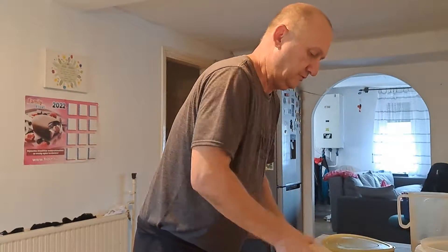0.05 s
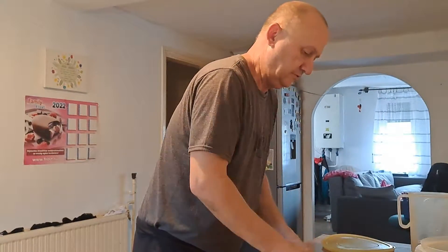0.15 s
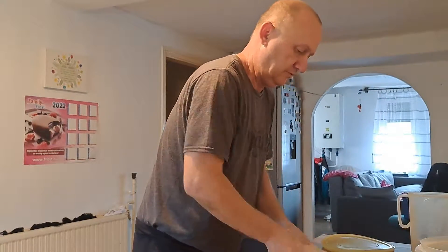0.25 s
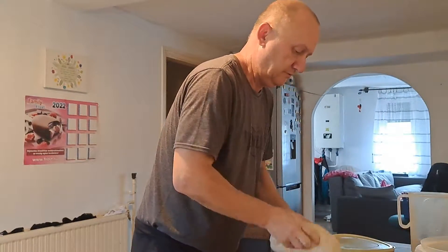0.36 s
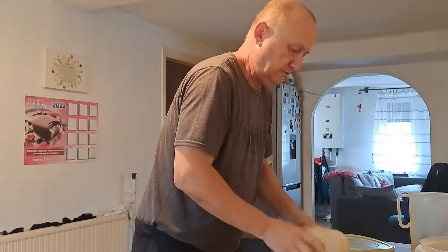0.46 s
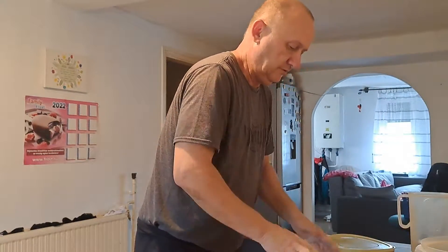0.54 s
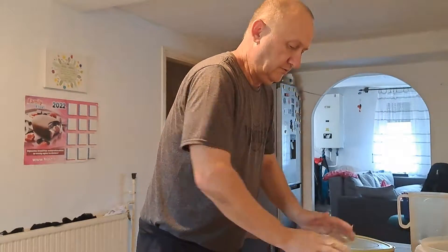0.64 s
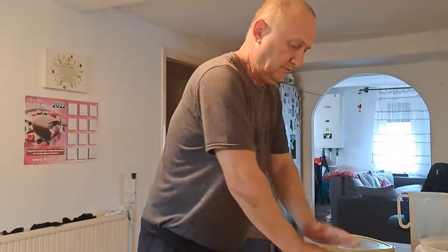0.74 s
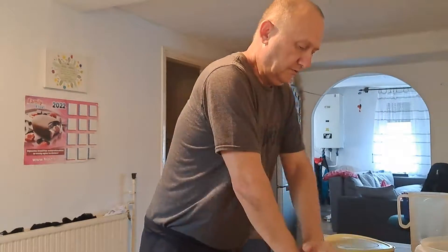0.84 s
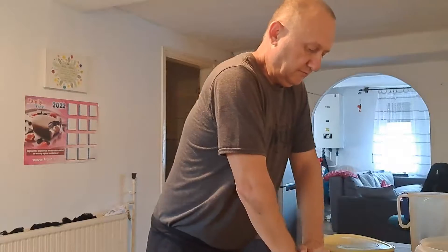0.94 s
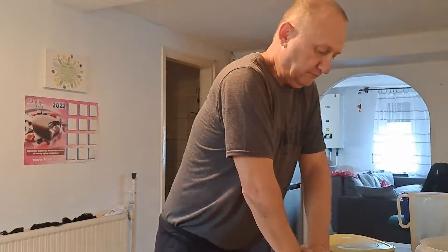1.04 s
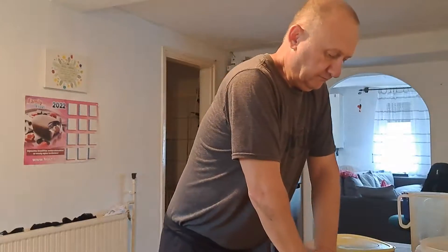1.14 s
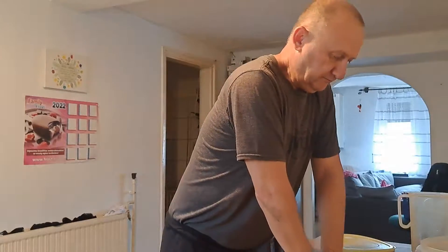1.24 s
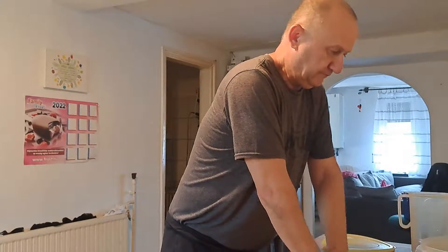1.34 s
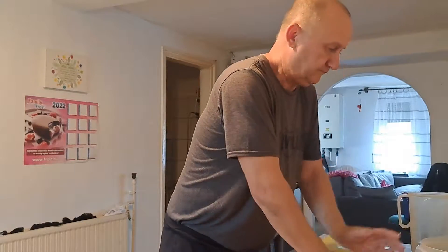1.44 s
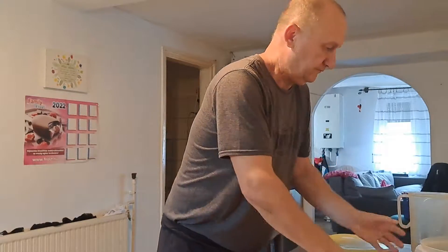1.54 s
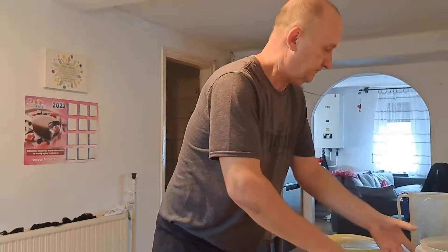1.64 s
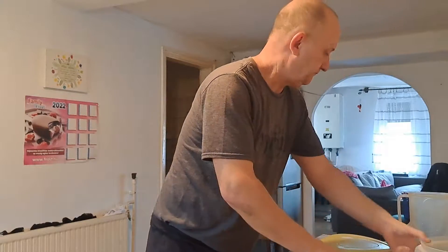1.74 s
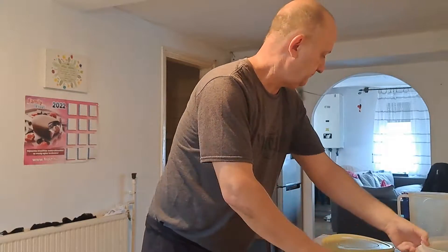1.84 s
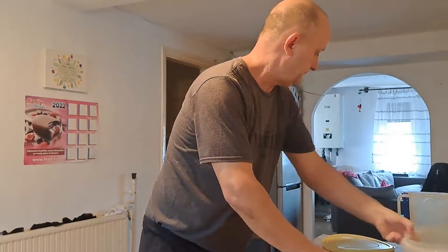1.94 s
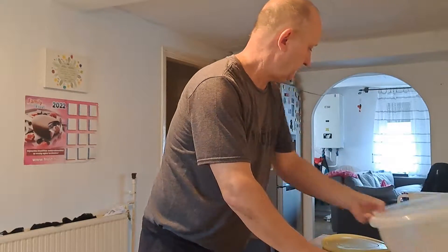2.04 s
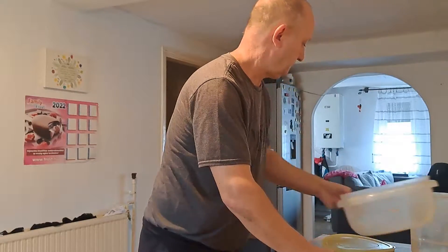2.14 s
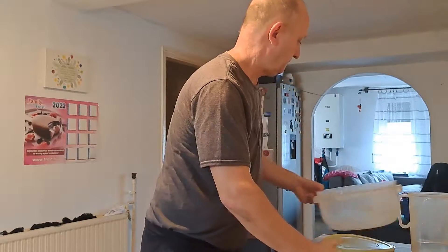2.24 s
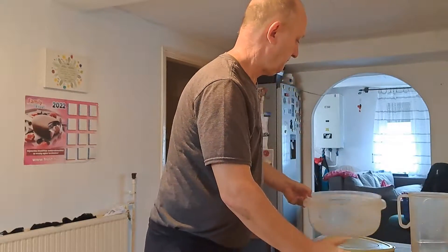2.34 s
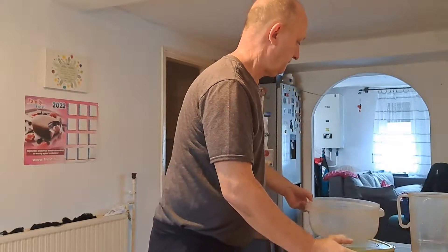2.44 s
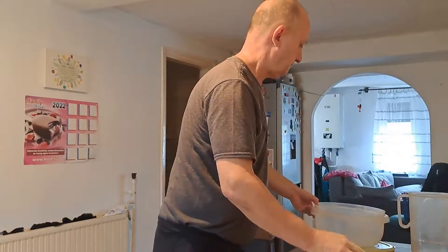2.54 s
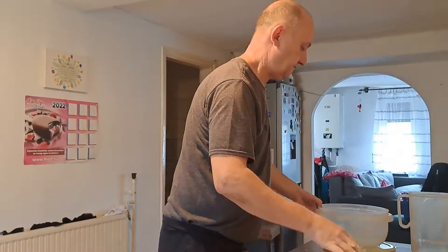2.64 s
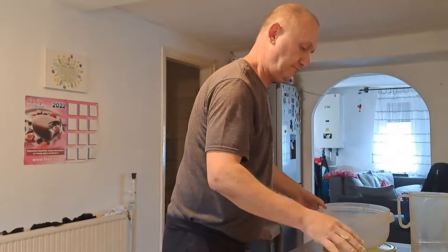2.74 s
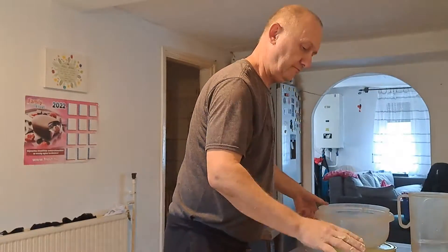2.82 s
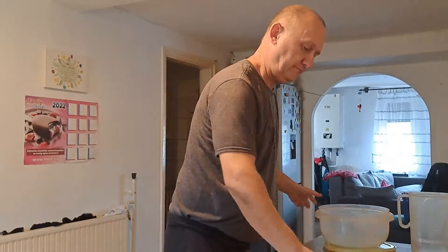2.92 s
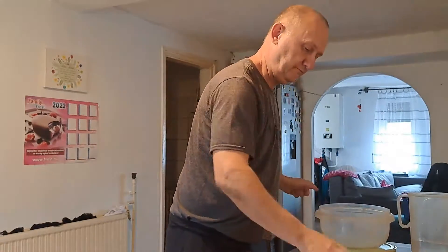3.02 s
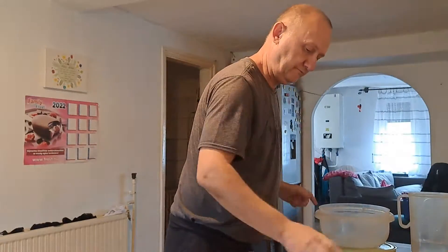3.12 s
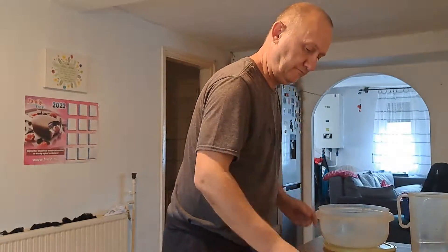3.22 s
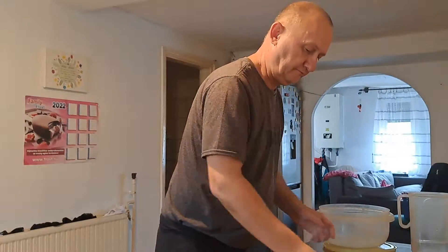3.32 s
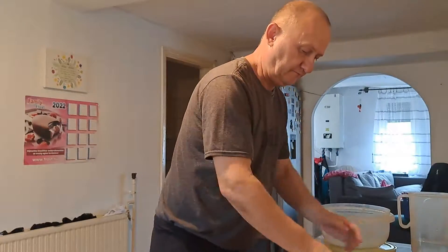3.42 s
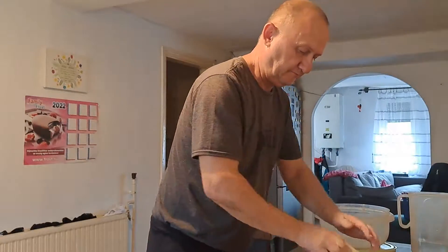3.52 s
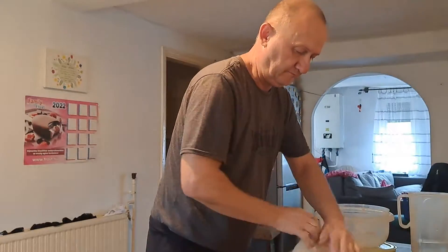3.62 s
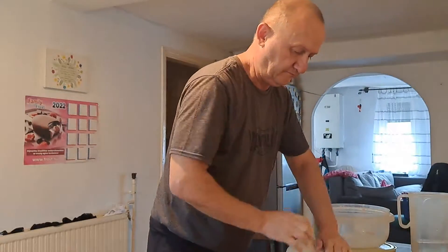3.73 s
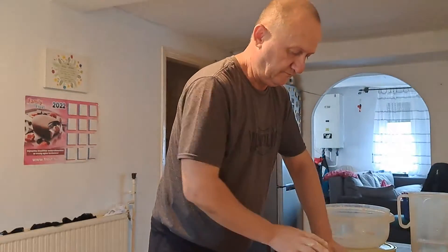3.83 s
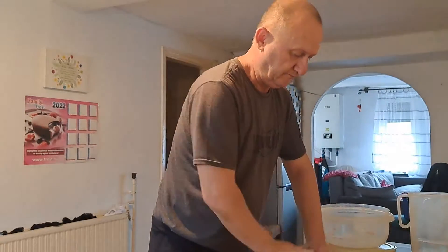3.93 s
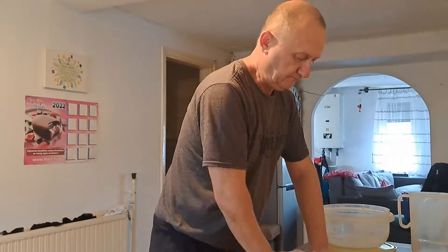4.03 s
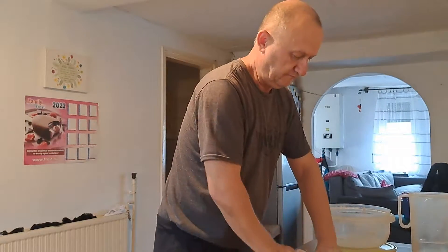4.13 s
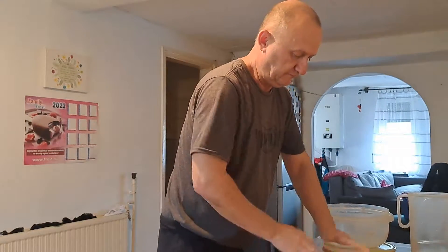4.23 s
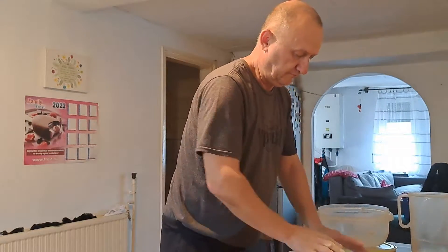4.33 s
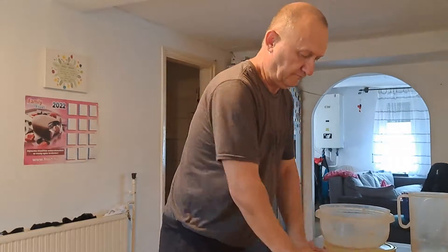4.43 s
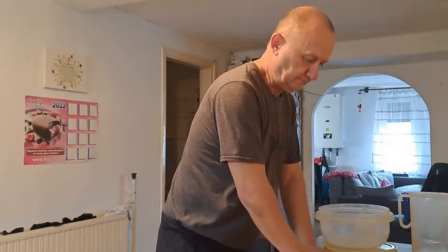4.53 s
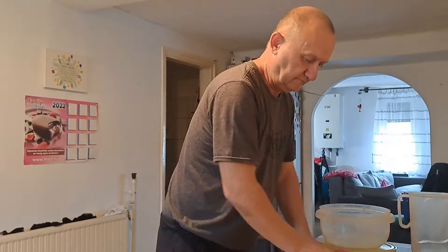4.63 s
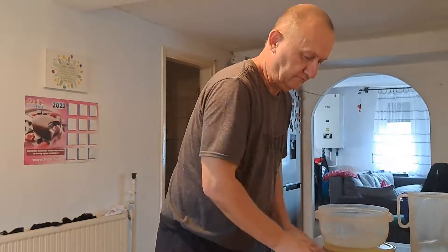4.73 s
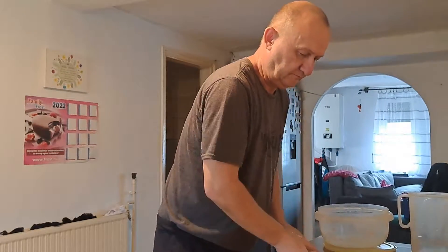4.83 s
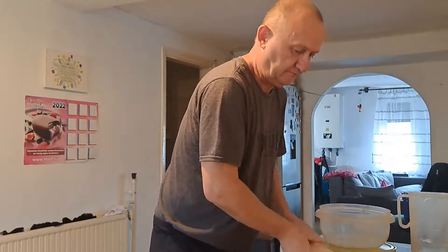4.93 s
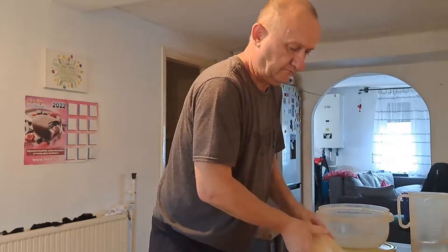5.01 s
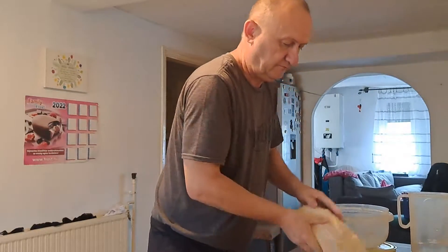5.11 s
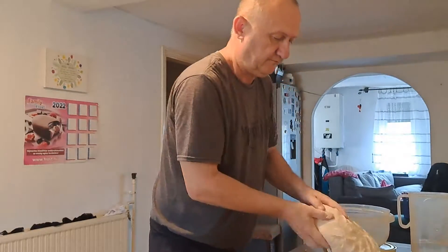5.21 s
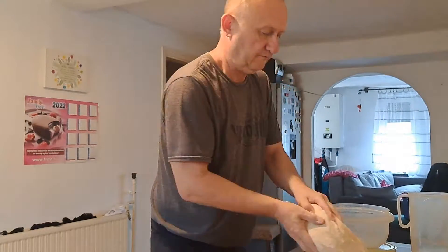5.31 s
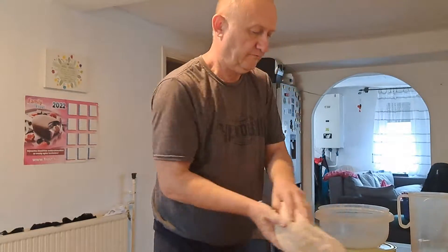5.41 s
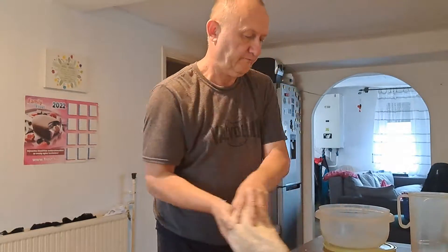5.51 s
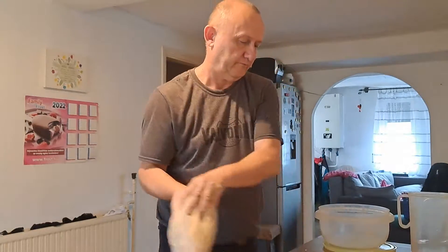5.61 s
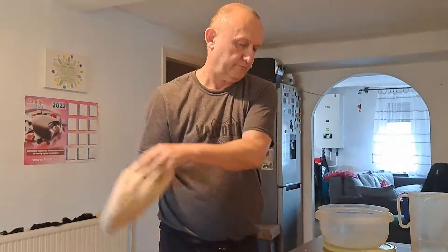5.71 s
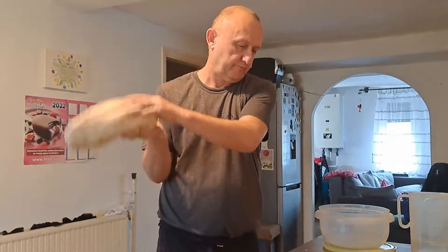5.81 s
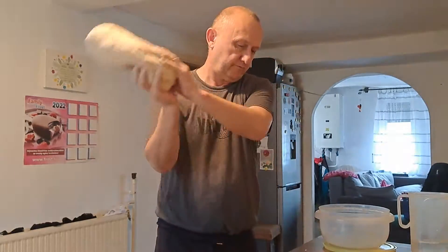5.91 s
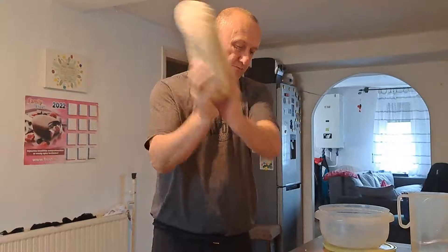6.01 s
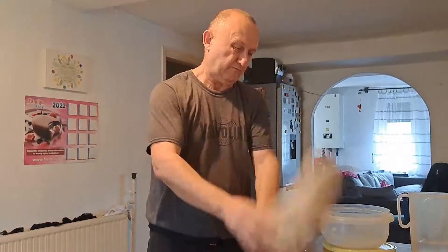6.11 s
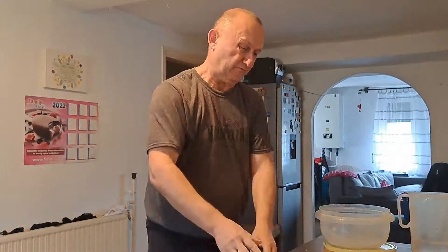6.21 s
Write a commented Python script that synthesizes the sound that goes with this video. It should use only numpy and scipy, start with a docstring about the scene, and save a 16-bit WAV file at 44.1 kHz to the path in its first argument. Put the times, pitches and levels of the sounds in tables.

```python
"""Bread dough drags over a floury kitchen table and takes soft pushes and smacks from the palms.
Each blow booms the table, knocks the board, pops out air and puffs flour. A plastic bowl is gripped
and set down with a clatter, and the table shudders as the baker leans on it. At last the dough is
swung overhead with a faint rush and slammed down, all about a metre away in a small, live room."""
import sys
import numpy as np
from scipy import signal
from scipy.fft import rfft, irfft
from scipy.io import wavfile

SR = 44100
rng = np.random.default_rng(int(sys.argv[2]) if len(sys.argv) > 2 else 0)


def persist_wave(psi):
    """Save psi, clipped to +-1, as 16-bit WAV."""
    counts = np.round(np.clip(psi, -1, 1) * 32767).astype(np.int16)
    wavfile.write(sys.argv[1], SR, np.atleast_2d(counts).T)


N = 276066
T = np.arange(N) / SR
AGE = T[:SR // 2]  # time since a blow
BLOW_HZ = np.arange(len(AGE) // 2 + 1) * SR / len(AGE)


def undb(db):
    """Decibels to gain."""
    return 10 ** (np.asarray(db) / 20)


def level(x, db, size=None):
    """Set the rms of the first size samples (all if none)."""
    return x * undb(db) / np.sqrt(np.mean(x[..., :size] ** 2))


def blow_level(x, db):
    """Set the rms of the first 35 ms of a blow."""
    return level(x, db, size=1544)


def add(out, s, x):
    """Mix x into out from time s."""
    i = int(np.clip(s * SR, 0, N - 1))
    out[:, i:i + x.shape[-1]] += x[..., :N - i]


def along(points, hz):
    """Read (f/Hz, value) points on a log-frequency axis."""
    f, value = np.transpose(points)
    return np.interp(np.log(hz + 1e-9), np.log(f), value)


def tint(x, points, size=1024):
    """EQ x with a curve of (f/Hz, gain/dB) points, made causal by way of the cepstrum."""
    gain = undb(along(points, np.arange(size // 2 + 1) * SR / size))
    cepstrum = irfft(np.log(gain))
    cepstrum[1:size // 2] *= 2
    cepstrum[size // 2 + 1:] = 0
    response = irfft(np.exp(rfft(cepstrum)))
    return signal.fftconvolve(np.atleast_2d(x), np.atleast_2d(response), axes=-1)[:, :x.shape[-1]]


def diffuse(size, port_gap_s=0.00051):
    """Spectrum of noise from all sides at two microphone ports: alike in the bass, wide in the treble."""
    count = size // 2 + 1
    mid, side = np.exp(2j * np.pi * rng.random((2, count)))
    alike = np.sinc(2 * port_gap_s * np.arange(count) * SR / size)
    mid, side = mid * np.sqrt(1 + alike), side * np.sqrt(1 - alike)
    return np.array([mid + side, mid - side]) * np.sqrt(size / 2)


def noise():
    """Diffuse white noise, as long as the scene."""
    return irfft(diffuse(N), N)


def rise(seconds):
    """Soft attack of a blow."""
    return 1 - np.exp(-AGE / seconds)


def fade(t60):
    """Exponential decay of a blow."""
    return np.exp(-np.log(1000) * AGE / t60)


def walk(rate):
    """Smooth random drift with a spread near 1."""
    knots = np.arange(0, T[-1] + 1, 1 / rate)
    return np.interp(T, knots, rng.standard_normal(len(knots)))


def gesture(start, length, attack_s, release_s):
    """Envelope of one movement: it builds, holds and dies away."""
    attack = np.clip((T - start) / attack_s, 0, 1)
    return attack * np.exp(-np.maximum(T - start - length, 0) / release_s)


# EQ of the quiet house: f/Hz, gain/dB
HOUSE_EQ = [(15, -32), (25, 2), (64, 2), (260, -11), (368, -5), (567, -18.5), (945, -8), (1110, -16.5),
            (4500, -30), (7500, -21), (9300, -28), (12200, -23), (15500, -24)]


def room_tone():
    """A faint steady bed of house rumble and hiss."""
    return level(tint(noise(), HOUSE_EQ, size=4096), -76)


# quick strokes through flour and air: peak t/s, half length/s, level/dB
STROKES = [(0.087, 0.028, -62.5), (0.563, 0.049, -67), (1.238, .06, -74), (1.917, 0.05, -70.5),
           (2.413, 0.028, -73), (2.79, .09, -74.5), (3.458, 0.054, -68), (3.66, 0.066, -68.5),
           (3.854, 0.079, -80.5), (4.683, 0.036, -64), (4.887, 0.046, -63.5), (5.146, 0.1, -66.5),
           (5.535, 0.026, -57), (5.637, 0.058, -62.5), (5.95, 0.072, -65.5), (6.222, 0.026, -54)]
# the dough is shoved or turned on the board: t/s, length/s, relative level/dB
SHOVES = [(0, 0.46, -66), (0.622, .26, -57), (1.274, 0.066, -52.5), (1.56, .32, -61.5),
          (1.992, 0.45, -73.5), (3.437, 0.22, -67.5), (4.144, 0.35, -62), (4.6, 0.25, -54),
          (4.894, .14, -59), (5.3, 1, -79.5)]
# EQs of bright sliding flour and dull dragging dough: f/Hz, gain/dB
FLOUR_EQ = [(600, -11.5), (1500, -2.5), (2600, -3), (5500, -0.5), (7500, 0.5), (9000, -7.5), (13000, -4.5),
            (16000, -8)]
DRAG_EQ = [(70, -6.5), (140, 4), (210, 0.5), (260, 2), (350, -2.5), (800, 0.5), (1200, -8), (2500, -13),
           (5000, -25.5), (12000, -40)]


def rubbing(sleeves_db=-86, shove_hiss_db=-58.5, hiss_per_drag=0.33, flicker_db=1.5, slip_db=1.0):
    """Sleeves rustle, floury skin hisses and the dough drags over the board in small uneven slips."""
    hiss = undb(sleeves_db + 2 * walk(4.86))
    for at, width, db in STROKES:
        hiss += undb(db) * np.exp(-.5 * ((T - at) / width) ** 2)
    drag = 0
    for start, length, db in SHOVES:
        shove = gesture(start, length, attack_s=0.029, release_s=0.049)
        drag += shove * undb(db - 2)
        hiss += shove * undb(shove_hiss_db + hiss_per_drag * db)
    slips = noise() * undb(flicker_db * walk(45) + slip_db * walk(700))
    flour = level(tint(slips, FLOUR_EQ, size=4096), 0)
    dough = level(tint(slips, DRAG_EQ, size=4096), 0)
    return flour * hiss + dough * drag


# reverb time of the kitchen: f/Hz, t60/s
ROOM_T60 = [(300, 0.44), (1500, 0.31), (5000, 0.41), (14000, 0.43)]


def contact(seconds, grain_db=4, direct_db=-4.5, early_t60=0.3, uneven_db=3):
    """A swarm of uneven little impacts, followed by near reflections and the room's tail."""
    seconds = max(seconds, 1e-3)
    sizes = undb(grain_db * rng.standard_normal(len(AGE)).clip(-2, 2))
    swarm = rng.standard_normal(len(AGE)) * sizes * np.exp(-AGE / seconds) * rise(seconds / 5)
    direct = np.array([np.pad(swarm, (8, 0))[:len(AGE)], swarm])  # reaches the left later
    # each spot on the table meets its own pattern of reflections, hence its own peaks and dips
    ripple_hz = np.geomspace(150, SR / 2, num=160)
    field = diffuse(len(AGE))
    field *= undb(uneven_db * np.interp(BLOW_HZ, ripple_hz, rng.standard_normal(len(ripple_hz))))
    centres, t60s = np.transpose(ROOM_T60)
    room = 0
    for share, t60 in zip(np.eye(len(centres)), t60s):
        band = irfft(field * along(np.column_stack([centres, share]), BLOW_HZ), len(AGE))
        room += band * (fade(t60) + fade(early_t60))
    room *= rise(seconds / 2)  # the room fills while the contact lasts
    return blow_level(direct, direct_db) + blow_level(room, 0)


def ring(modes, left_lag_s=0.00025):
    """Decaying resonances, a touch detuned on every hit and a little late on the left."""
    detunes = 1 + 0.0075 * rng.standard_normal(len(modes))
    age = np.array([AGE - left_lag_s, AGE])
    return sum(undb(db) * fade(t60) * np.sin(2 * np.pi * hz * detune * age)
               for (hz, db, t60), detune in zip(modes, detunes))


def table_boom(rise_s, t60, rest_hz=62.4, lift_hz=10, settle_s=0.077):
    """The whole table swings up slowly; it sounds a little higher while the hand bears down."""
    hz = rest_hz + lift_hz * np.exp(-AGE / settle_s)
    boom = np.sin(2 * np.pi * np.cumsum(hz) / SR) * rise(rise_s) ** 2 * fade(t60)
    return level(boom, 0, size=3500)


# low thump of the table top and woody ring of its board: f/Hz, level/dB, t60/s
THUMP_MODES = [(124.7, -3.5, 0.28), (139.9, 3.5, 0.21), (208.4, -14, 0.23)]
BOARD_MODES = [(298, -11, 0.07), (358, 1.5, 0.15), (392.6, -9, 0.13), (476, -11, 0.17)]
# EQs of board knock, cupped air, skin smack and puffed flour: f/Hz, gain/dB
KNOCK_EQ = [(100, -15.5), (150, -4.5), (205, -2.5), (260, -6.5), (340, 0.5), (500, 1), (650, -7.5),
            (1200, -51)]
AIR_EQ = [(300, -29), (500, -4), (630, 2.5), (830, 0.5), (1000, -6.5), (1150, -18), (2200, -49)]
SMACK_EQ = [(600, -27), (1050, -17), (1320, 4), (1600, -1.5), (2000, 2.5), (2550, -3), (3100, -7),
            (4400, -7.5), (5500, -13), (6500, -15), (10000, -49)]
PUFF_EQ = [(2500, -32), (4500, -2), (5500, 0.5), (7500, 1), (8800, -7.5), (10500, -8.5), (13000, -4),
           (16000, -14.5)]
THUMP_PER_WEIGHT = 0.28  # dB more thump for each dB of weight in a push or pat


def strike(boom, boom_db, thump_db, knock_db, air_db, smack_db, flour_db, contact_s, ring_db):
    """One blow on the dough: the table booms and rings, air pops out, skin smacks, flour hisses."""
    impact = contact(contact_s)
    thump = ring(THUMP_MODES) * rise(0.022)
    board = ring(BOARD_MODES) * rise(0.0079)
    knock = blow_level(tint(impact, KNOCK_EQ), 0) + blow_level(board, ring_db)
    body = undb(boom_db) * boom + blow_level(thump, thump_db) + blow_level(knock, knock_db)
    air = blow_level(tint(impact, AIR_EQ), air_db)
    smack = blow_level(tint(impact, SMACK_EQ), smack_db)
    flour = blow_level(tint(impact, PUFF_EQ), flour_db)
    return body + air + smack + flour


# soft pushes and folds; weight feeds the low end, slap the smack:
# t/s, base level/dB, weight/dB, slap/dB, contact/s
PUSHES = [(0.049, -50, -27, -12, 0.027), (0.217, -51.5, -2, -5, 0.019), (0.249, -54, 12.5, -17, 0.015),
          (0.318, -56.5, 11.5, -17, 0.019), (0.734, -52, 15, -3, 0.04), (0.964, -64.5, -6, -20, .013),
          (1.069, -62.5, -5, -31, .021), (1.173, -51.5, -17, -35, 0.04), (1.223, -60, 2, -19, 0.059),
          (1.281, -51, -23, -7, 0.025), (1.451, -58, -9, -13, 0.015), (1.541, -57, -6, -25, 0.044),
          (1.771, -53.5, -25, -7, 0.033), (2.126, -59.5, -37, -13.5, 0.038), (3.318, -63.5, -12, -31, .025),
          (3.4, -59.5, 1, -23, 0.032), (3.453, -59, -2, -12.5, 0.011), (3.585, -52, -14, -7, .016),
          (3.617, -57, -8, -10.5, 0.014), (4.159, -58.5, -6, 4.5, 0.006), (4.284, -57, -12, -6.5, 0.014),
          (4.586, -44.5, 2, -7.5, 0.022), (4.73, -41, -10, -11, .025), (4.848, -50.5, -15, -10, 0.0099),
          (5.059, -60, -3, -25, 0.027), (5.133, -63.5, -19, 4, 0.028), (5.254, -67.5, -3, -9, 0.011)]


def pushes():
    """The heel of the hand sinks in and damps the table: brisk pushes puff more, gentle ones ring."""
    out, boom = np.zeros((2, N)), table_boom(rise_s=0.014, t60=0.29)
    for s, db, weight, slap, contact_s in PUSHES:
        push = strike(boom, boom_db=db - 5 + weight, thump_db=db - 1.5 + THUMP_PER_WEIGHT * weight,
                      knock_db=db - 3, air_db=db - 3 + 0.3 * slap, smack_db=db - 3 + slap,
                      flour_db=db - 15 + 0.54 * slap, contact_s=contact_s, ring_db=-7 - 0.35 * slap)
        add(out, s, push)
    return out


# flat palm hits: t/s, base level/dB, weight/dB, slap/dB
PATS = [(0.172, -49, -7, -21), (0.585, -42.5, 9.5, -2), (1.341, -51.5, -13.5, 6.5), (1.63, -51.5, -30, -16),
        (3.001, -49.5, 1, 4), (3.121, -52, -11.5, 8), (4.006, -49, 0.5, 3), (4.086, -48, -16, -1.5),
        (4.333, -54.5, -7.5, 0), (4.493, -40.5, 6, -0.5), (4.935, -47.5, -11, -8.5)]


def pats(worked_in_db_per_s=1.2):
    """Flat palms boom the table and smack the dough, hissing less as the loose flour is kneaded in."""
    out, boom = np.zeros((2, N)), table_boom(rise_s=0.05, t60=0.35)
    for s, db, weight, slap in PATS:
        pat = strike(boom, boom_db=db + weight, thump_db=db - 3 + THUMP_PER_WEIGHT * weight,
                     knock_db=db - 2, air_db=db - 3, smack_db=db - 1 + slap,
                     flour_db=db - 6 + slap - worked_in_db_per_s * s, contact_s=0.0075, ring_db=-5.5)
        add(out, s, pat)
    return out


# the grip, then the set-down: t/s, shell/dB, rim tick/dB, ring within shell/dB, thump/dB, contact/s
BOWL_KNOCKS = [(1.874, -51.5, -58.5, -19, -89, 0.013), (2.626, -34.5, -45, -1.5, -62, 0.013)]
# resonances of the plastic bowl: f/Hz, level/dB, t60/s
BOWL_MODES = [(390, 0.5, 0.19), (526, -11, 0.28), (684, -18, 0.061), (990, -6, 0.23), (1238, -5, 0.11),
              (1363, -3, 0.18), (1430, -24, 0.17), (1655, -3, 0.14), (1870, 6, 0.087), (2510, -4, 0.13)]
# EQs of its hollow shell and bright rim: f/Hz, gain/dB
SHELL_EQ = [(120, -18.5), (250, -13), (330, -1.5), (400, 4), (700, -3.5), (1000, 2), (1900, -6.5),
            (2600, -8), (3300, -18.5), (8000, -54.5)]
RIM_EQ = [(1200, -23.5), (2500, 3.5), (4000, 1), (7500, -9), (9000, -17.5), (13000, -26), (16000, -20)]


def bowl():
    """The bowl is gripped, which damps its shell; then it clatters on the table and rings briefly."""
    out = np.zeros((2, N))
    for s, shell_db, rim_db, ring_db, thump_db, contact_s in BOWL_KNOCKS:
        impact = contact(contact_s, grain_db=7)
        ringing = ring(BOWL_MODES) * rise(contact_s)
        shell = blow_level(ringing, ring_db) + blow_level(tint(impact, SHELL_EQ), 0)
        thump = blow_level(ring(THUMP_MODES) * rise(0.066), thump_db)
        tick = blow_level(tint(impact, RIM_EQ), rim_db)
        add(out, s, thump + blow_level(shell, shell_db) + tick)
    return out


# the baker leans on the table and it rocks on its legs: t/s, length/s, relative level/dB
LEANS = [(2.63, 0.087, -60), (3.0, 0.11, -57), (3.436, 0.32, -59), (3.99, .06, -51), (4.493, 0.59, -59),
         (5.228, 0.052, -56.5)]


def rocking(sway_hz=42, trim_db=-1.5):
    """The table frame shudders at its lowest resonance under the baker's weight."""
    load = sum(undb(db) * gesture(start, length, attack_s=0.042, release_s=0.085)
               for start, length, db in LEANS)
    phase = 2 * np.pi * np.cumsum(sway_hz * (1 + 0.2 * walk(20))) / SR
    shudder = np.sin(phase) * undb(3.0 * walk(17))
    return level(shudder, trim_db) * load


# the wind-up for the throw: t/s, length/s, level/dB
SWING = (5.7, 0.65, -67)
# EQ of its hollow rush: f/Hz, gain/dB
RUSH_EQ = [(120, -18), (190, -8.5), (225, 0.5), (270, -10.5), (550, -24), (800, -24), (950, -9.5),
           (1100, -24), (1350, -21), (1700, -44)]


def swing():
    """A faint hollow rush swells as the arms lift the dough."""
    start, length, db = SWING
    rush = level(tint(noise(), RUSH_EQ, size=4096), db)
    return rush * gesture(start, length, attack_s=0.19, release_s=0.051)


# the dough lands: t/s, boom/dB, thump/dB, knock/dB, air/dB, smack/dB, flour/dB, contact/s (1 ms floor)
SLAM = (6.2236, -23, -21.5, -19, -22.5, -18.5, -21, -0.26)


def slam():
    """The whole lump hits the bare table and the trapped air cracks out."""
    out = np.zeros((2, N))
    s, *blow = SLAM
    add(out, s, strike(table_boom(rise_s=0.025, t60=0.3), *blow, ring_db=8.5))
    return out


# stereo tilt of the work on the table: f/Hz, left minus right/dB
BEARING = [(60, 0), (110, 1.5), (200, 3), (380, -2), (700, -4), (1290, -4.5), (2380, -2), (4400, -3),
           (8120, -3), (15000, 2.5)]


def from_right(x):
    """The work lies to the right, so the left side is shaded in the mids and most of the treble."""
    return np.vstack([tint(channel, [(hz, side * db / 2) for hz, db in BEARING])
                      for channel, side in zip(x, (1, -1))])


def scene():
    """Kneading, the bowl and the final throw over the quiet of the kitchen."""
    work = pats() + pushes() + slam() + bowl() + rubbing() + swing()
    return from_right(work) + rocking() + room_tone()


def record(dry, top_hz=15900):
    """A soft clip rounds the highest peaks and a steep low-pass cuts the top."""
    rounded = dry / (1 + dry ** 4) ** .25
    return signal.sosfilt(signal.ellip(10, .2, 80, top_hz, fs=SR, output="sos"), rounded)


dry = scene()
out = record(dry)
persist_wave(out)
```